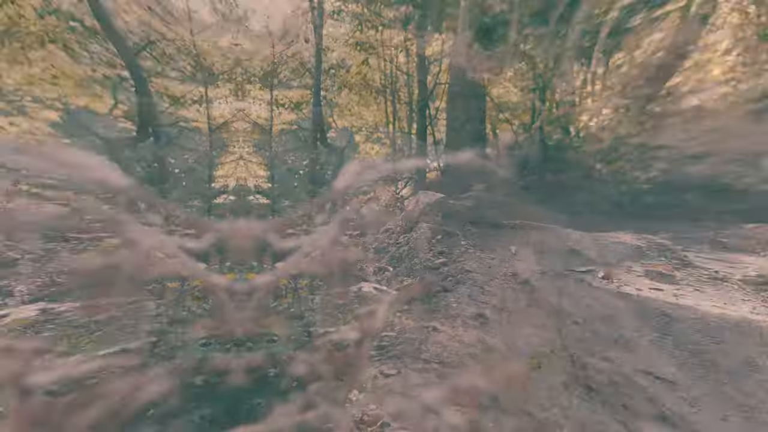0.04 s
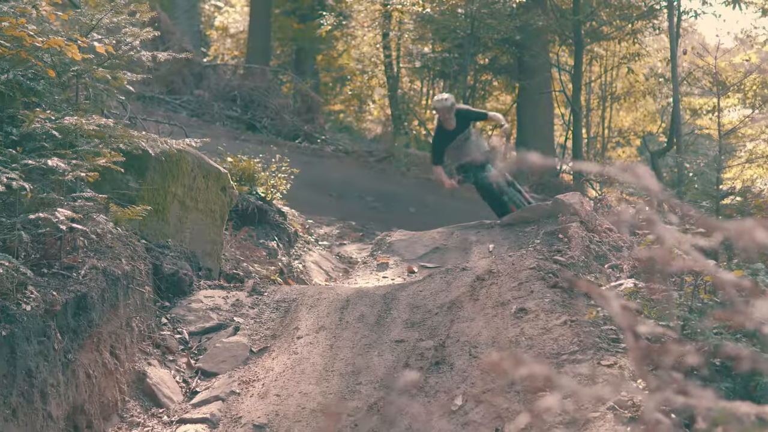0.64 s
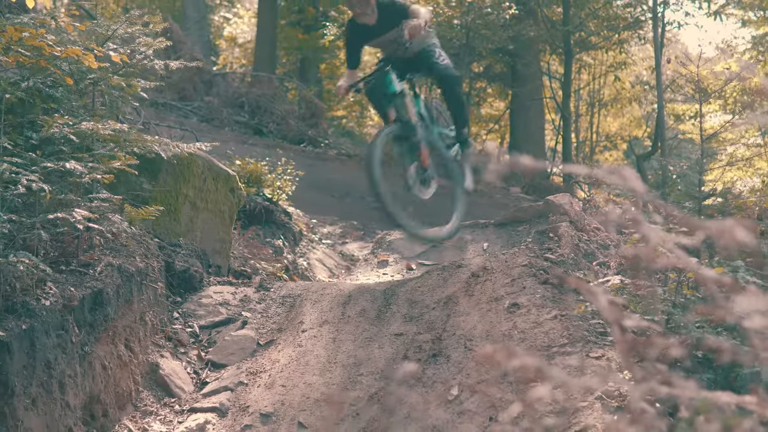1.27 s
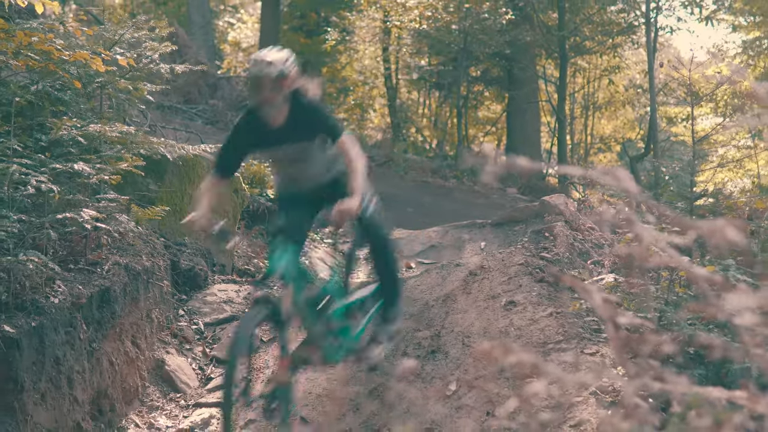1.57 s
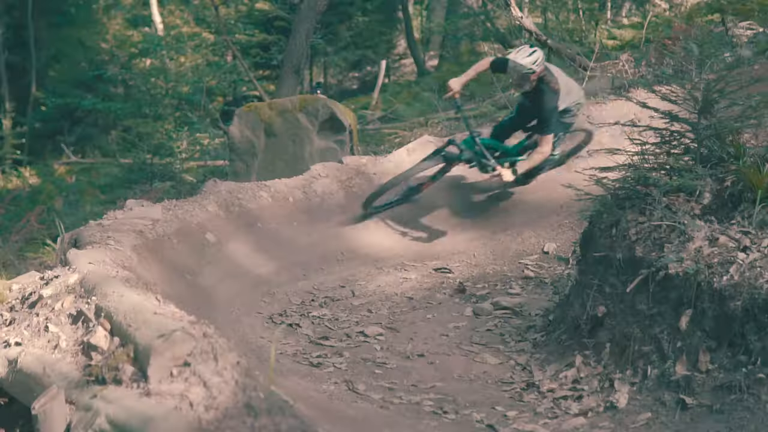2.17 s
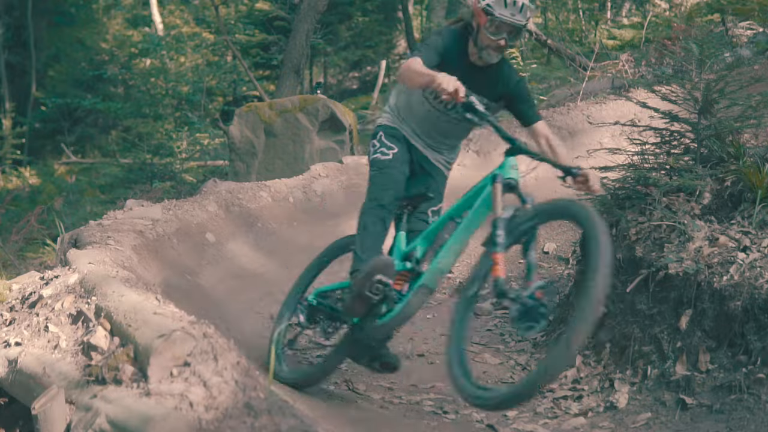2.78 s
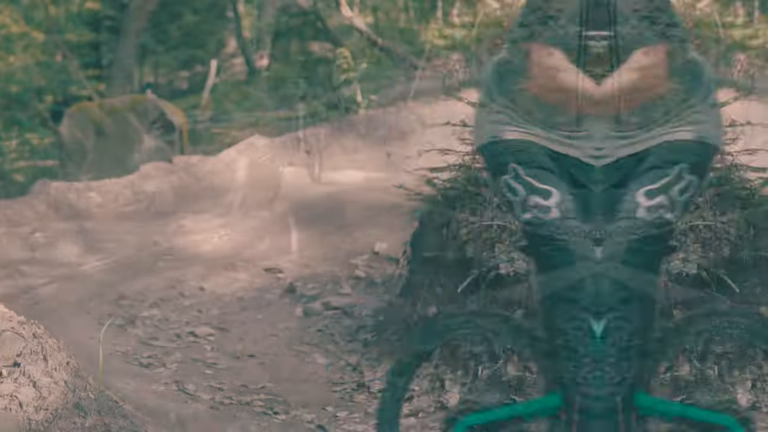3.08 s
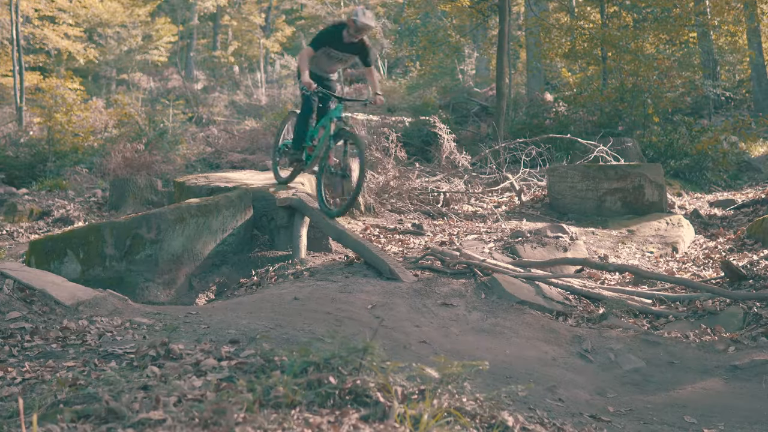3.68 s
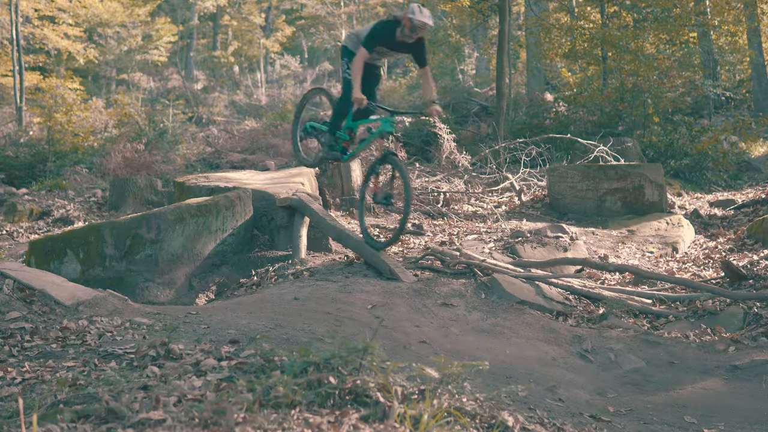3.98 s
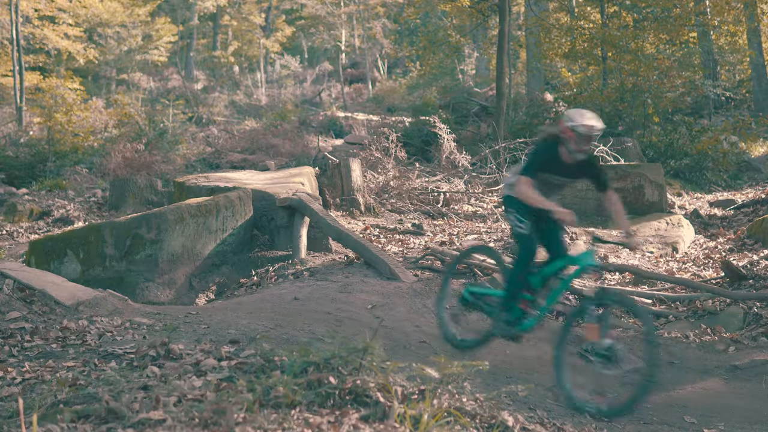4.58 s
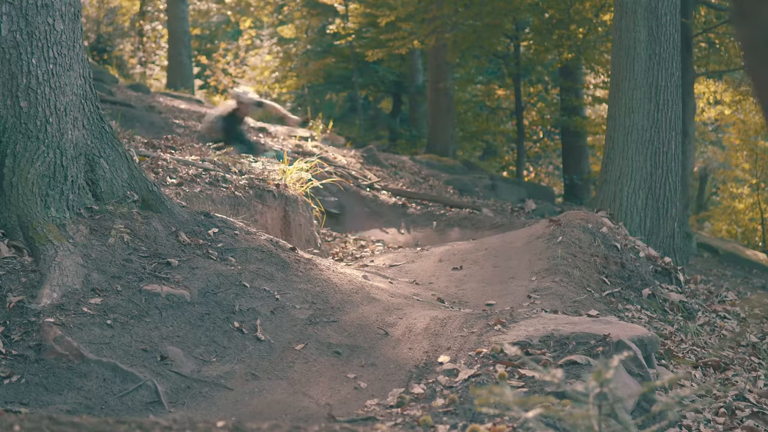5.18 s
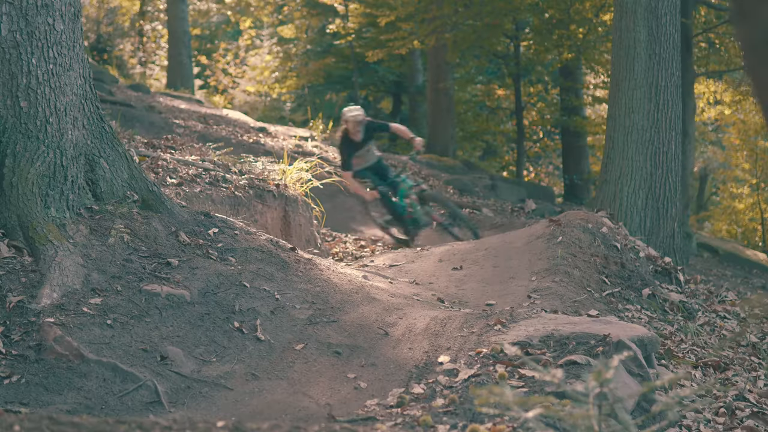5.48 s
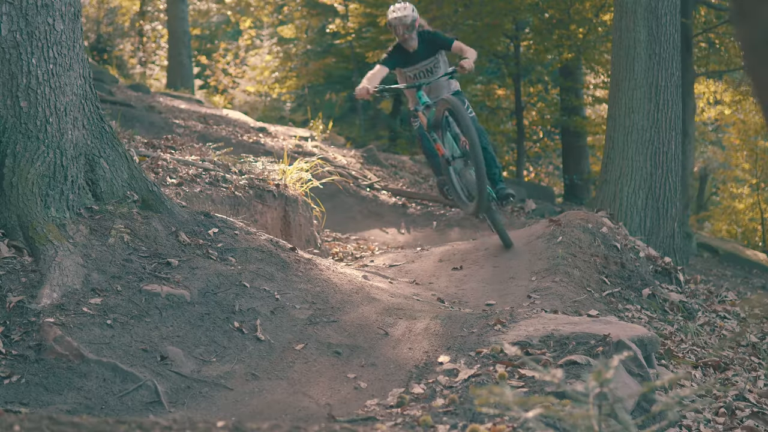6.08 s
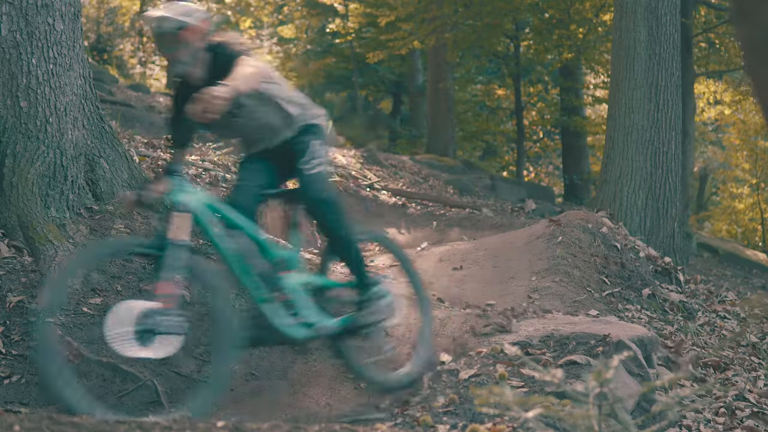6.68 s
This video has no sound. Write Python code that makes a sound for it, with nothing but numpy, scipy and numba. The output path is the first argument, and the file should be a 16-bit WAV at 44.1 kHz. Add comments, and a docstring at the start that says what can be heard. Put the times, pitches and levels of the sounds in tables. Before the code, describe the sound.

A mountain bike coasts past several times on a forest trail, freehub buzzing, tyres crunching over dirt, with thumping landings and chain clatter.

```python
"""A mountain bike's freehub ratchet buzzes at wheel speed as it coasts past four times on a forest trail:
over a jump, round a berm, off a drop, over a hump. Pawls snap off the teeth and ring hub and wheel.
Knobby tyres roar, hum and crunch on dirt; chain and stones clack; landings thump through the frame;
the suspension squeaks thinly. Air and leaves stir, and the trees give a faint echo."""
import sys
import numpy as np
from scipy import signal
from scipy.fft import rfft, irfft
from scipy.io import wavfile
from scipy.ndimage import uniform_filter1d, map_coordinates
from numba import njit

SR = 44100
rng = np.random.default_rng(int(sys.argv[2]) if len(sys.argv) > 2 else 0)


def dump_mix(stems):
    """Bounce the given channels to the path in sys.argv[1] as a 16-bit WAV at rate SR."""
    frames = np.atleast_2d(stems).T  # one column per channel
    limited = np.clip(frames, -1, 1)  # hard clip at full scale
    pcm = np.round(limited * 32767).astype(np.int16)
    wavfile.write(sys.argv[1], SR, pcm)


N = 301644
T = np.arange(N) / SR

# ratchet speed per pass: time_s, click_rate_hz
JUMP_RATE = [(0, 140.8), (.2, 141.5), (.6, 186.8), (1.12, 140.4), (1.37, 95.27), (1.6, 125.4),
             (1.75, 193.7), (1.95, 150.5)]
BERM_RATE = [(2.12, 105.5), (2.3, 178.2), (2.6, 168), (2.9, 133.5), (3.19, 68.4), (3.26, 105),
             (3.48, 100.2), (3.555, 85), (3.58, 49.87), (3.66, 24), (3.85, 29.5)]
DROP_RATE = [(4.43, 60.35), (4.479, 86), (4.661, 63.3), (4.7, 124.7), (4.759, 138.2), (4.92, 89.1),
             (4.96, 134.5), (5.031, 101.3)]
HUMP_RATE = [(5.25, 128.3), (5.601, 160.3), (5.92, 146.1), (6.04, 110.1), (6.219, 132.3), (6.448, 75.9),
             (6.801, 147.4)]
# freehub loudness per pass: time_s, level_db
JUMP_LEVEL = [(0, -32.5), (0.09, -28.5), (0.4, -37.5), (0.7, -45.5), (1.1, -41), (1.37, -41.5),
              (1.68, -30.5), (1.9, -29.5)]
BERM_LEVEL = [(2.001, -32.5), (2.3, -36), (2.65, -39.5), (2.93, -29.5), (3.28, -23), (3.42, -37.5),
              (3.5, -44), (3.58, -52), (3.801, -57)]
DROP_LEVEL = [(4.47, -35), (4.56, -42), (4.78, -37), (4.9, -39.5)]
HUMP_LEVEL = [(5.1, -35), (5.35, -38.5), (5.8, -43), (6.02, -41.5), (6.15, -40), (6.55, -40.5), (6.83, -33)]
# parts rung by the pawls: pitch_hz, width_hz, gain_db
SPOKE_MODES = [(6000, 600, -1.4), (6350, 100, -2.3), (8120, 390, 2), (9530, 270, -1), (11120, 1300, 0.42),
               (12800, 770, 1)]
SHELL_MODES = [(2913, 300, 2.5), (3236, 210, -4)]
WHEEL_MODES = [(2278, 500, 0)]
SPROCKET_MODES = [(4550, 930, 0)]
CASSETTE_MODES = [(3934, 92, 0)]
# ring gains as the wheel swings: centre_s, half_width_s, shell_db, wheel_db, cassette_db, sprockets_db
RING_FLARES = [(1.078, 0.14, 5.5, 8, 7, 5), (1.471, 0.033, 2, 9, 2, 4), (1.535, 0.039, 0.5, 3, -2, 12.5),
               (1.87, 0.016, 4, 12, -8, -4), (2.11, 0.079, 10, 9, 7, 11), (2.32, 0.075, 3.5, 10, 9, 15.5),
               (2.66, 0.086, 9.5, 16, 10, 9), (2.92, 0.052, 6.5, 6, -8, 7), (3.04, 0.035, 6.5, 12, 12, 1),
               (3.12, 0.028, 8, 8, 11, 13), (3.33, 0.031, 4, 6, 16, 17), (3.43, 0.05, 9, 10, 20, 20),
               (3.539, 0.033, -5, -5, 9, 12), (4.77, 0.04, 3, 10, -2, 4), (4.85, 0.033, 5, 12, -8, -8),
               (4.935, 0.037, 10, 19.5, 0, 0), (5.01, 0.049, 3, 6, 1, -3), (5.181, 0.13, 4, 14, 12, 8),
               (5.749, 0.15, -8, -9, 5, 8), (6.12, 0.031, 4, 7, 6, 8), (6.2, 0.15, 2, 9, 1, 8.5),
               (6.54, 0.093, 11.5, 16, -4, -1), (6.83, 0.067, 6, 6, 3, 12)]
# pass-by pitch shift of the hub, and the wheel's extra glide: centre_s, half_width_s, shift_share
HUB_DOPPLER = [(1.65, 0.21, 0.047), (2.92, 0.12, 0.026), (3.4, 0.099, -0.02), (4.82, 0.079, -0.027),
               (6.65, 0.22, .025)]
WHEEL_GLIDES = [(1.02, 0.064, 0.0019), (3.0, 0.22, 0.0018), (4.72, 0.11, 0.19), (5.03, 0.051, -.07),
                (6.25, 0.13, -0.019)]
# narrow hub ring facing the listener: centre_s, half_width_s, pitch_hz, gain_db
ZINGS = [(1.02, 0.026, 2770, -2), (1.47, 0.022, 2950, -1), (3.043, 0.045, 2981, -1.5),
         (4.757, 0.021, 2840, 4), (5.19, 0.045, 2960, 2), (6.82, 0.036, 2926, 0)]
# rear wheel in view or hidden: centre_s, half_width_s, treble_db
GLINTS = [(.27, 0.062, -7), (1.2, 0.14, 1), (1.66, .05, 6), (2.932, 0.17, 6), (3.3, 0.14, -8.5),
          (6.2, 0.085, 3), (6.55, 0.082, -2)]
# ground reflection on close passes: centre_s, half_width_s, added_lag_s
LAG_SWEEPS = [(.35, 0.31, 0.00014), (2.25, 0.24, 0.00031), (2.82, 0.15, 0.00039), (3.37, 0.096, 0.00076),
              (4.98, 0.343, 0.000598), (5.62, .2, 0.00035), (6.3, 0.12, 0.00077)]
# bike far off among the trunks: centre_s, half_width_s
FAR_SPANS = [(.55, 0.49), (1.15, 0.48), (5.7, 0.46)]

# spectral shapes: frequency_hz, relative_db
TICK_SPECTRUM = [(600, -27), (1700, -29), (2300, 2), (3900, -3.5), (5000, -0.5), (6000, 0.5), (8500, -0.5),
                 (10400, -3.5), (13500, -4.5), (15500, -29)]
TREAD_SPECTRUM = [(30, 8), (60, -41), (140, -2.5), (255, -1.5), (320, -0.5), (410, -2.5), (600, -1),
                  (950, -2), (1400, -11), (3000, -12.5), (9000, -36)]
GRIT_SPECTRUM = [(300, 4), (800, -16), (1300, 3.5), (2400, -0.5), (3300, 5.5), (4500, -2.5), (9000, -3),
                 (15000, -19)]
RUMBLE_SPECTRUM = [(15, 4), (40, -5), (100, -5), (160, -11), (300, -36), (1000, -27)]
FOREST_SPECTRUM = [(13, -34), (22, -10), (49, 5.5), (99, 3), (302, -16.5), (356, -12.5), (668, -17.5),
                   (978, -16), (1180, -16.5), (1510, -23.5), (3080, -27.5), (5030, -35.5), (11100, -40),
                   (15000, -55)]
CLACK_SPECTRUM = [(150, 8), (600, 3), (1500, 5.5), (2400, 1), (3200, 9.5), (4500, -8), (9000, -17),
                  (15000, -40)]
KNOCK_SPECTRUM = [(60, 5), (170, -10), (260, 4.5), (400, -3), (650, 1), (1000, -2.5), (1800, -8),
                  (3500, -20.5), (9000, -34)]

# tyres bearing on dirt: start_s, end_s, start_db, slope_db_per_s
ROLLS = [(0, 0.949, -34.5, -2.5), (1.618, 1.89, -27, 11.5), (1.9, 2.195, -30.5, -15),
         (2.228, 2.658, -26.5, 0), (2.68, 3.149, -36.5, 3.5), (3.168, 3.255, -25.5, -6),
         (4.47, 5.054, -42, -8.5), (5.054, 5.325, -35.5, 13), (5.37, 5.83, -34.5, -9),
         (5.887, 6.439, -40.5, -2.5), (6.537, 6.84, -30, -11)]
# tyre casing, low and high mode: pitch_hz, width_hz, gain_db
CASING_MODES = [(256, 43, -10.5), (405, 60, -7)]
# tyres ploughing loose dirt: centre_s, half_width_s, grit_db, rumble_db
SKIDS = [(.02, 0.098, -31.5, -22), (.32, 0.041, -39, -37), (1.74, 0.032, -32, -42), (1.86, .03, -28, -44),
         (2.05, 0.13, -32.5, -26), (2.749, 0.12, -36.5, -42), (2.97, 0.14, -34, -46),
         (3.26, 0.15, -33, -29.5), (4.7, 0.18, -44, -37), (5.13, 0.19, -31, -36), (6.39, 0.061, -33, -49),
         (6.59, 0.082, -45, -38), (6.8, 0.17, -35.5, -39)]
# chain slaps and flung stones: start_s, level_db, relative_treble_db
CLACKS = [(0.159, -27, 0), (0.3425, -22.5, -18), (0.363, -19, -17), (0.5178, -20.5, -15),
          (1.8477, -24, -16), (1.865, -21, -16), (2.027, -13.5, -5), (2.1557, -10, -23), (2.186, -7, -25),
          (2.2665, -13, -19), (2.41, -36, -16), (2.671, -18, -21), (3.16, -2.5, -8), (3.1647, -8, -14),
          (3.1893, -14, -8), (3.203, -10, -21), (3.625, -41, 8), (3.8085, -28, -6), (3.8886, -35.5, -18),
          (4.0353, -53, 15), (4.135, -47, -27), (4.245, -39, -22), (4.3132, -28, -2), (4.324, -29.5, -1),
          (4.3352, -36, -2), (4.3476, -33, -12), (4.411, -16, -26), (4.4232, -20, -25), (4.4588, -17, -10),
          (4.4712, -13.5, -3), (4.897, -22.5, -6), (4.9073, -14.5, -5), (5.049, -16.5, -2),
          (5.0577, -13, -11), (5.1545, -15.5, -23), (5.2238, -17.5, -17), (5.2575, -15.5, -6),
          (5.4373, -22, -7), (6.3361, -20.5, -1.5), (6.4113, -11, -9), (6.4311, -14.5, -14),
          (6.481, -15, -26), (6.5157, -24, -27), (6.529, -12, -23), (6.629, -14.5, -12), (6.7273, -19, -12)]
# chain and brake rotor: pitch_hz, width_hz, gain_db
ROTOR_MODES = [(1590, 190, -25), (1980, 130, -7.5), (3130, 86, -22), (3650, 160, -4.5), (6550, 200, -21)]
# knobs striking in step on smooth dirt: centre_s, half_width_s, knob_rate_hz, level_db
HUMS = [(0.549, 0.27, 473, -37.5), (.85, 0.066, 440, -32.5), (1.5, 0.071, 410, -56),
        (1.76, 0.17, 399.5, -26.5), (1.82, 0.12, 510, -26.5), (2.55, 0.1, 410, -49),
        (3.0, 0.13, 294.6, -34), (5.7, 0.17, 430.9, -49)]
# stones, twigs and chain links: start_s, level_db, centre_hz, t60_s
CRACKS = [(0.343, -21, 2600, .02), (0.52, -35, 2170, .02), (1.075, -32, 1780, 0.027),
          (1.155, -30, 2440, .03), (1.575, -23, 2100, .02), (1.711, -19, 1280, 0.019),
          (1.741, -24, 1490, .02), (1.836, -14.5, 1820, 0.024), (1.8495, -10.5, 2700, .01),
          (1.869, -15, 2200, .02), (1.881, -24, 1504, .02), (2.027, -14, 2200, .02),
          (2.1875, -13, 2800, 0.016), (2.239, -25, 3600, .012), (2.412, -15, 1390, 0.015),
          (2.72, -19, 1450, .02), (3.602, -41, 3586, 0.016), (3.762, -41, 3600, .04),
          (3.77, -45, 4600, .02), (3.808, -28.5, 3520, 0.014), (4.0344, -52, 6500, 0.024),
          (4.131, -40, 1820, .03), (4.1995, -37, 2100, .015), (4.2175, -37, 2090, .015),
          (4.227, -40, 2220, 0.013), (4.244, -42, 1930, .02), (4.269, -37.5, 2800, .02),
          (4.3135, -39, 5015, 0.016), (4.4115, -16, 1860, .02), (4.425, -14.5, 2291, .015),
          (5.064, -17, 1800, 0.027), (5.127, -17, 3600, 0.02), (5.1555, -13, 2550, 0.014),
          (5.16, -16, 3142, .015), (5.273, -17, 3340, 0.021), (5.309, -24, 1703, .02),
          (5.371, -25, 1870, 0.016), (5.4385, -26, 2187, .02), (5.448, -27, 3600, .02),
          (5.497, -37, 1484, 0.049), (5.5395, -24.5, 1397, .022), (5.589, -28, 3204, 0.022),
          (5.615, -24, 2303, 0.018), (6.11, -23, 2300, 0.032), (6.34, -18, 2690, 0.032),
          (6.372, -26, 4175, 0.017), (6.386, -27, 3103, 0.023), (6.518, -12, 2700, 0.01)]
# wheel landing or hitting a bump: start_s, thump_db, knock_db, knock_t60_s, boom_db
LANDINGS = [(1.568, -15.5, -28.5, 0.064, -20), (1.698, -5.5, -21.5, 0.073, -22),
            (1.709, -23, -18.5, 0.053, -29), (1.722, -17, -27, 0.089, -20), (2.026, -4, -23, 0.098, -7.5),
            (2.173, -3, -23, 0.057, -20), (2.187, -13, -15.5, 0.05, -4), (2.304, -19, -31, 0.067, -15),
            (2.41, -43, -14, 0.055, -22), (3.103, -10, -24, 0.09, -40), (3.16, -4, -19, 0.13, -40),
            (3.28, -23, -28, 0.073, -40), (4.243, -23, -42, 0.2, -35), (4.411, -5, -22, 0.19, -28),
            (4.445, -10, -36, 0.11, -40), (5.222, -10, -30, 0.16, -19), (5.372, -20, -39, 0.074, -26),
            (6.478, 0.5, -14, 0.12, -12), (6.498, -3, -19.5, 0.16, -25), (6.554, -27, -25, 0.11, -22)]
# tyre and suspension bounce, squashed tyre, hollow frame, chain on steel: pitch_hz, gain_db, t60_s
BOUNCE_MODES = [(45, -28, 0.1), (66, -3.5, 0.15), (76, -8, 0.27), (106, -3, 0.12), (167, -19.5, 0.049),
                (262, -13, 0.067)]
BOOM_MODES = [(155, 15.5, 0.016), (211, 2, 0.071)]
FRAME_MODES = [(980, -13, 0.074), (953, -6, 0.07), (1640, -22, 0.044), (3500, -22, 0.029)]
CLINK_MODES = [(1720, -14, 0.094), (2320, -8, 0.057), (3140, -4, 0.038), (3800, -2, 0.032),
               (6729, -17, 0.069)]
# suspension strokes: start_s, level_db, pitch_hz, length_s, fall_share
SQUEAKS = [(1.894, -13.5, 14000, 0.036, .04), (1.91, -22, 13300, .025, .04),
           (2.022, -16, 14050, 0.031, 0.049), (2.048, -31, 13900, 0.045, .03),
           (3.717, -36, 13300, 0.039, .025), (3.735, -51, 13200, .09, .003),
           (4.628, -23.5, 13800, 0.041, .045), (5.146, -23.5, 13630, 0.027, .04),
           (5.196, -34, 13920, 0.029, 0.031), (5.339, -28, 13800, 0.026, 0.034),
           (5.45, -38, 13600, 0.073, 0.011)]
# chain hitting steel: start_s, level_db
CLINKS = [(3.6273, -22), (3.807, -41)]
# frame taps on the ramp of the drop: start_s, level_db, pitch_ratio
FRAME_TAPS = [(3.642, -33, 1.01), (3.707, -26, 1.01), (3.7536, -28, 1.02), (3.775, -32, 1.03),
              (3.806, -25.5, .99)]


def amp(db):
    """Decibels to gain."""
    return 10 ** (np.asarray(db) / 20)


def curve(rows):
    """Straight lines through (time_s, value) rows."""
    return np.interp(T, *np.transpose(rows))


def swell(centre_s, half_width_s):
    """Gaussian bell in time, peak 1."""
    return np.exp(-((T - centre_s) / half_width_s) ** 2)


def swells(rows):
    """Sum of bells from (centre_s, half_width_s, height) rows."""
    return sum(height * swell(s, width_s) for s, width_s, height in rows)


def unit(x):
    """Scale to rms 1."""
    return x / np.sqrt(np.mean(x ** 2) + 1e-18)


def add(out, start_s, x):
    """Mix x into out at start_s."""
    i = int(np.clip(start_s * SR, 0, N - 1))
    out[i:i + len(x)] += x[:N - i]


def fade(t, t60_s):
    """Exponential decay, -60 dB at t60_s."""
    return np.exp(-np.log(1000) * t / t60_s)


def colour(x, spectrum, size=2048):
    """Minimum-phase filter; white noise keeps its power."""
    hz, db = np.transpose(spectrum)
    bins_hz = np.fft.rfftfreq(size, 1 / SR)
    log_gain = np.log(amp(np.interp(np.log(bins_hz + 1), np.log(hz), db)))
    cepstrum = irfft(log_gain)[:size // 2]
    cepstrum[1:] *= 2
    response = irfft(np.exp(rfft(cepstrum, size)))
    return signal.fftconvolve(x, response / np.linalg.norm(response))[:len(x)]


def resonate(x, modes):
    """Parallel resonators."""
    return sum(amp(db) * signal.lfilter(*signal.iirpeak(hz, hz / width_hz, SR), x)
               for hz, width_hz, db in modes)


def ring(t, modes):
    """Struck modes as decaying sines, peak 1."""
    x = sum(amp(db) * np.sin(2 * np.pi * hz * t) * fade(t, t60_s) for hz, db, t60_s in modes)
    return x / np.abs(x).max()


@njit
def moving_band(x, hz, width_hz):
    """State-variable band-pass with a moving centre."""
    y, band_state, low_state = np.empty(len(x)), 0., 0.
    for i in range(len(x)):
        g, damping = np.tan(np.pi * hz[i] / SR), width_hz / hz[i]
        band = (band_state + g * (x[i] - low_state)) / (1 + g * (g + damping))
        band_state, low_state = 2 * band - band_state, low_state + 2 * g * band
        y[i] = damping * band
    return y


def bent_ring(x, modes, bend):
    """Double band-passes of alternating sign, pitch scaled by bend; rms 1."""
    out = 0
    for k, (hz, width_hz, db) in enumerate(modes):
        once = moving_band(x, hz * bend, float(width_hz))
        out += (-1) ** k * amp(db) * moving_band(once, hz * bend, float(width_hz))
    return unit(out)


def walk(rate_hz):
    """Smooth random wander, rms 1."""
    steps = rng.standard_normal(N // 20)
    path = np.interp(T * rate_hz, np.arange(len(steps)), steps)
    return unit(uniform_filter1d(path, max(int(SR / rate_hz / 2), 1)))


def grains(per_s, spread_db):
    """Random tiny impacts of uneven size, rms 1."""
    size = amp(spread_db * np.minimum(rng.exponential(size=N), 5))
    return unit((rng.random(N) < per_s / SR) * size * rng.standard_normal(N))


def coasting(stop_s=3.858, resume_s=4.42):
    """1 while the ratchet turns, 0 while it rests off the drop."""
    return 1. * ((T < stop_s) | (T > resume_s))


def hub_db():
    """Freehub loudness over the four passes."""
    return curve([*JUMP_LEVEL, *BERM_LEVEL, *DROP_LEVEL, *HUMP_LEVEL])


def close_db(mid_distance_db=-34):
    """Excess of freehub loudness over that at middle distance."""
    return np.maximum(hub_db() - mid_distance_db, 0)


def pawls(slop_s=.00009, stagger_s=.001, jitter_s=.00018, chatter_s=.004, step_db=-2, scatter_db=.75):
    """Three pawls drop off each tooth almost together and chatter. Returns rasp and blows."""
    rate_hz = curve(JUMP_RATE + BERM_RATE + DROP_RATE + HUMP_RATE) * coasting()
    teeth_s = np.flatnonzero(np.diff(np.floor(np.cumsum(rate_hz) / SR))) / SR
    t = T[:SR // 50]
    strikes, snaps, chatter = np.zeros((3, N))
    noise = rng.standard_normal(N)
    for tooth_s, (slop, force, *jitters) in zip(teeth_s, rng.standard_normal((N // 100, 5))):
        s = abs(tooth_s + slop_s * slop)
        # sparse clicks each carry more energy
        size = amp([scatter_db * force]) / np.sqrt(max(rate_hz[int(tooth_s * SR)], 30))
        add(strikes, s, size)
        for pawl, jitter in enumerate(jitters):
            add(snaps, s + pawl * (stagger_s + jitter_s * jitter), size * amp(step_db * pawl))
        add(chatter, s, size * np.exp(-(t / chatter_s) ** 2))
    rasp = unit(amp(-8) * unit(snaps) + unit(chatter * noise))
    blows = unit(strikes) + amp(-7) * rasp  # heavy parts feel one blow per tooth
    return rasp, blows


def freehub(spokes_db=-10, turn_db=1.5, lean_db=1.8, waver_share=.011, duck_db_per_db=.55):
    """Pawls tick and ring spokes, shell, wheel and gears; each ring wanders as the bike turns and leans."""
    rasp, blows = pawls()
    bend = 1 + waver_share * walk(20) + swells(HUB_DOPPLER)
    spokes = sum(amp(db + turn_db * walk(9)) * moving_band(rasp, hz * bend, float(width_hz))
                 for hz, width_hz, db in SPOKE_MODES)
    tick = glint(unit(colour(rasp, TICK_SPECTRUM) + amp(spokes_db) * unit(spokes)))
    flares_db = sum(np.outer(dbs, swell(s, width_s)) for s, width_s, *dbs in RING_FLARES)
    shell_db, wheel_db, cassette_db, sprockets_db = flares_db
    wheel_bend = bend + swells(WHEEL_GLIDES)
    shell = bent_ring(blows, SHELL_MODES, bend) * amp(shell_db - 4 + lean_db * walk(12))
    wheel = bent_ring(blows, WHEEL_MODES, wheel_bend) * amp(wheel_db - 12 + lean_db * walk(6.5))
    sprockets = bent_ring(blows, SPROCKET_MODES, bend) * amp(sprockets_db - 14 + lean_db * walk(11))
    cassette = unit(resonate(blows, CASSETTE_MODES)) * amp(cassette_db - 13 + lean_db * walk(3.73))
    # close by, the ticks gain on the rings
    rings = (shell + wheel + sprockets + cassette) * amp(-duck_db_per_db * close_db())
    return (ground_echo(tick) + rings + zings(blows)) * amp(hub_db())


def glint(x, treble_hz=9800):
    """Narrowly beamed treble comes and goes as the bike turns."""
    treble = signal.sosfiltfilt(signal.butter(2, treble_hz, "high", fs=SR, output="sos"), x)
    return x + treble * (amp(swells(GLINTS)) - 1)


def ground_echo(x, base_lag_s=.000361, wander_share=.14, echo_db=-7, cutoff_hz=6500):
    """Dull reflection off the dirt; its moving lag sweeps whirr and hiss."""
    lag_s = base_lag_s * np.exp(wander_share * walk(5)) + swells(LAG_SWEEPS)
    dull = signal.lfilter(*signal.butter(1, cutoff_hz, fs=SR), x)
    return x + amp(echo_db) * map_coordinates(dull, [(T - lag_s) * SR], order=3)


def distance_blur(x, far_share=.61, t60_s=.04, paths=8):
    """Trunks and banks in turn scatter the buzz, more when the hub is far."""
    share = np.clip(far_share * sum(swell(s, width_s) for s, width_s in FAR_SPANS), 0, 1)
    t = T[:SR // 16]
    trunks = rng.standard_normal((paths, len(t))) * fade(t, t60_s)
    weights = np.array([walk(45) for _ in trunks])
    weights /= np.linalg.norm(weights, axis=0)
    scattered = sum(weight * signal.fftconvolve(x, trunk / np.linalg.norm(trunk))[:N]
                    for weight, trunk in zip(weights, trunks))
    return x * np.sqrt(1 - share) + scattered * np.sqrt(share)


def rolling(bite_s=.044, release_s=.1, fanning_db=-60):
    """Tyre envelope: each stretch bites, drifts and lets go, over a floor of knobs fanning air."""
    power = amp(fanning_db) ** 2
    for start_s, end_s, db, db_per_s in ROLLS:
        grip = np.interp(T, [start_s - bite_s, start_s, end_s, end_s + release_s], [0, 1, 1, 0])
        elapsed_s = np.clip(T, start_s, end_s) - start_s
        power += (grip * amp(db + db_per_s * elapsed_s)) ** 2
    return np.sqrt(power)


def tyre_roar(roll, bumps, casing_db=-1, stiffening=.88, easy_load_db=-28):
    """Knobs drum on packed dirt and ring the casing; load favours its higher mode."""
    knobs = colour(grains(per_s=3000, spread_db=.5), TREAD_SPECTRUM)
    low, high = (amp(mode[2]) * unit(resonate(knobs, [mode])) for mode in CASING_MODES)
    load_db = np.clip(20 * np.log10(roll) - easy_load_db, -4, 10) * stiffening
    casing = low * amp(-load_db) + high * amp(load_db / 2)
    return (knobs + amp(casing_db) * casing) * roll * amp(1.97 * bumps)


def tyre_grit(roll, skid, grit_db=-9, spray_db=-7.5, patch_db=1.5):
    """Grit crunches in uneven patches, most in skids."""
    spray = amp(hub_db() - close_db() + spray_db) * coasting()
    crunch = np.sqrt((roll * amp(grit_db)) ** 2 + skid ** 2 + spray ** 2)
    return colour(grains(per_s=1800, spread_db=-1.5), GRIT_SPECTRUM) * crunch * amp(patch_db * walk(45))


def tyres(rumble_db=-13):
    """Roar, grit and the rumble of ground shaken by the wheels."""
    roll, bumps = rolling(), walk(35)
    skid_grit, skid_rumble = sum(np.outer(amp(dbs), swell(s, width_s)) for s, width_s, *dbs in SKIDS)
    roar = tyre_roar(roll, bumps)
    grit = tyre_grit(roll, skid_grit)
    shake = np.hypot(roll * amp(rumble_db), skid_rumble) * amp(.44 * bumps)
    rumble = colour(rng.standard_normal(N), RUMBLE_SPECTRUM) * shake
    return roar + ground_echo(glint(grit)) + rumble


def pebbles(per_s=22, gain_db=-12, centre_hz=2000, width_hz=1800, t60_s=.021):
    """Small pebbles pop at random under the tyres, at varying pitch."""
    hits = (rng.random(N) < per_s / SR) * rng.random(N)
    pops = signal.fftconvolve(hits, fade(T[:SR // 16], t60_s))[:N] * rng.standard_normal(N)
    bend = np.exp(np.tanh(walk(40)))
    return bent_ring(pops, [(centre_hz, width_hz, 0)], bend) * rolling() * amp(gain_db)


def forest(level_db=-41.5, gust_db=1.2):
    """Low rumble of moving air, faint hush of leaves."""
    gain = amp(level_db + gust_db * walk(4))
    return colour(rng.standard_normal(N), FOREST_SPECTRUM, size=8192) * gain


def clacks(body_t60_s=.092, snap_t60_s=.14, rotor_db=7, body_db=-7.5, snap_db=-12, rattles_per_s=18):
    """Chain and stones hit the frame: dry clack, bright snap, steel ring. Lesser hits rattle at random."""
    t = T[:SR // 8]
    jolts = (rng.random(N) < rattles_per_s / SR) * rng.random(N) * rolling() * amp(6)
    body = signal.fftconvolve(jolts, fade(t, body_t60_s))[:N] * rng.standard_normal(N)
    snap = np.zeros(N)
    for s, db, treble_db in CLACKS:
        add(body, s, amp(db) * rng.standard_normal(len(t)) * fade(t, body_t60_s))
        add(snap, s, amp(db + treble_db) * rng.standard_normal(len(t)) * fade(t, snap_t60_s))
    clack = colour(body, CLACK_SPECTRUM) + amp(rotor_db) * resonate(body, ROTOR_MODES)
    return amp(body_db) * clack + amp(snap_db) * colour(snap, TICK_SPECTRUM)


def tread_hum(waver_share=.0886, throb_db=3):
    """Knob rows strike in step; uneven dirt shakes pitch and level."""
    warped_s = np.cumsum(1 + waver_share * walk(150)) / SR
    hum = sum(amp(db) * swell(s, width_s) * np.sin(2 * np.pi * hz * warped_s)
              for s, width_s, hz, db in HUMS)
    return hum * amp(throb_db * walk(70))


def cracks(width_share=.51):
    """Stones, twigs and chain links crack: short, dry bursts of band noise."""
    out, t = np.zeros(N), T[:SR // 16]
    for s, db, hz, t60_s in CRACKS:
        band = [(hz, hz * width_share, 0)]
        burst = resonate(resonate(rng.standard_normal(len(t)), band), band)
        add(out, s, amp(db) * unit(burst) * fade(t, t60_s))
    return out


def zings(blows, width_hz=190):
    """A narrow hub ring flares for a few teeth as it faces the listener."""
    return sum(bent_ring(blows, [(hz, width_hz, 0)], np.ones(N)) * amp(db) * swell(s, width_s)
               for s, width_s, hz, db in ZINGS)


def landings(slam_s=.00019, slam_db=2, thud_db=2, bounce_db=-7.5, bounce_lag_s=.0022):
    """The tyre slams and booms, the bike bounces, frame and ground give a dull knock."""
    t = T[:SR // 2]
    thumps, knocks = np.zeros((2, N))
    slam = -t / slam_s * np.exp(1 - t / slam_s)
    bounce, boom = ring(t, BOUNCE_MODES), ring(t, BOOM_MODES)
    for s, thump_db, knock_db, knock_t60_s, boom_db in LANDINGS:
        add(thumps, s, amp(knock_db + slam_db) * slam)
        add(thumps, s + bounce_lag_s, amp(thump_db + bounce_db) * bounce + amp(boom_db) * boom)
        add(knocks, s, amp(knock_db) * rng.standard_normal(len(t)) * fade(t, knock_t60_s))
    return thumps + amp(thud_db) * colour(knocks, KNOCK_SPECTRUM)


def squeaks(waver_share=.014):
    """Suspension strokes give thin, rough squeaks that fall in pitch."""
    out, wobble = np.zeros(N), walk(1000)
    for s, db, hz, length_s, fall_share in SQUEAKS:
        stroke = np.linspace(0, 1, int(length_s * SR))
        pitch_hz = hz * (1 - fall_share * stroke + waver_share * wobble[int(s * SR):][:len(stroke)])
        add(out, s, amp(db) * np.sin(np.pi * stroke) * np.sin(2 * np.pi * np.cumsum(pitch_hz) / SR))
    return out


def chain_clinks():
    """The chain strikes steel and rings briefly."""
    out, clink = np.zeros(N), ring(T[:SR // 5], CLINK_MODES)
    for s, db in CLINKS:
        add(out, s, amp(db) * clink)
    return out


def frame_knocks(scuff_db=-12, scuff_t60_s=.012):
    """Light taps scuff the hollow frame and ring it."""
    out, t = np.zeros(N), T[:SR // 5]
    for s, db, pitch_ratio in FRAME_TAPS:
        scuff = colour(rng.standard_normal(len(t)), CLACK_SPECTRUM) * fade(t, scuff_t60_s)
        add(out, s, amp(db) * (ring(t * pitch_ratio, FRAME_MODES) + amp(scuff_db) * scuff))
    return out


def tree_echo(x, t60_s=.59, wet_db=-13.5, delay_s=.006):
    """Trunks and banks add a thin, duller echo."""
    t = T[:SR]
    scatter = colour(rng.standard_normal(len(t)), [(100, -3.5), (1000, -9), (4000, -7.5), (14000, -9)])
    echo = scatter * fade(t, t60_s) * (t > delay_s)
    return x + amp(wet_db) * signal.fftconvolve(x, echo / np.linalg.norm(echo))[:N]


def scene():
    """The bike among the trees, mono."""
    bike = distance_blur(freehub()) + tyres() + tread_hum() + landings() + clacks()
    bike += cracks() + pebbles() + frame_knocks() + chain_clinks() + squeaks()
    return (tree_echo(bike) + forest())[None]


def record(dry, low_hz=24, top_hz=15750):
    """Gentle bass cut, steep treble cut."""
    thinned = signal.sosfilt(signal.butter(2, low_hz, "high", fs=SR, output="sos"), dry)
    return signal.sosfilt(signal.ellip(12, .2, 90, top_hz, fs=SR, output="sos"), thinned)


dry = scene()
out = record(dry)
dump_mix(out)
```